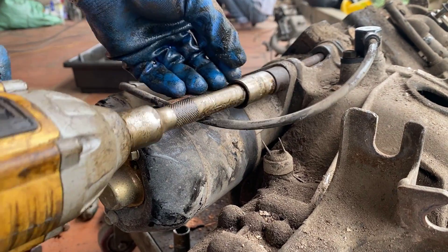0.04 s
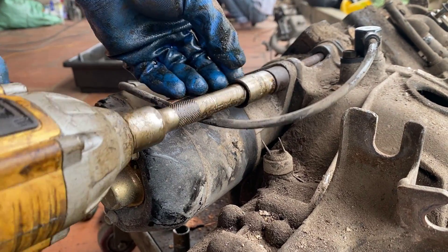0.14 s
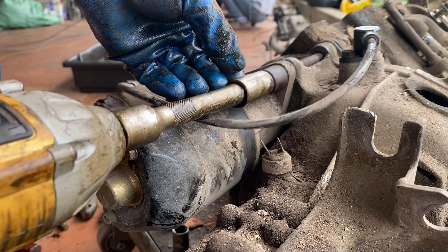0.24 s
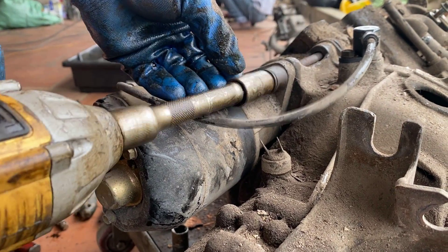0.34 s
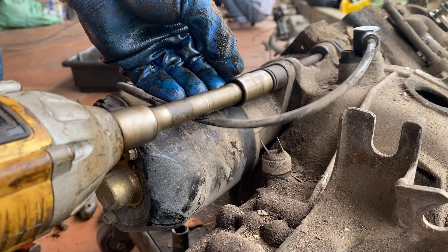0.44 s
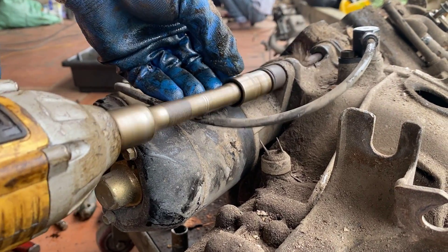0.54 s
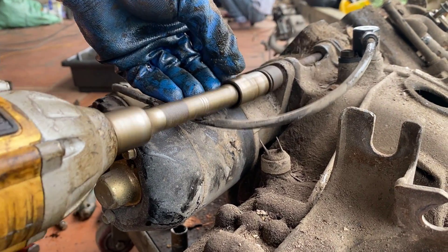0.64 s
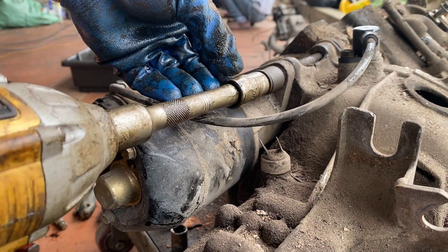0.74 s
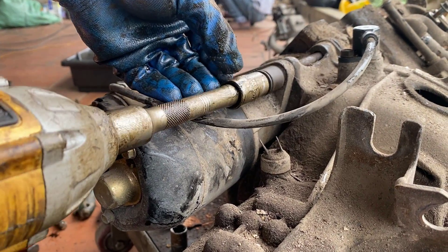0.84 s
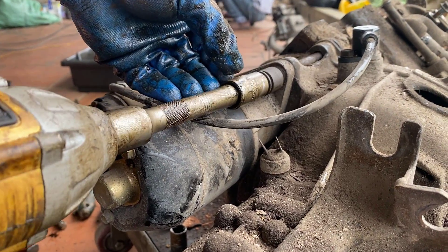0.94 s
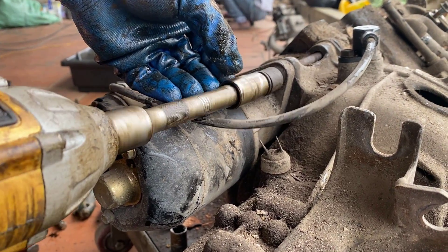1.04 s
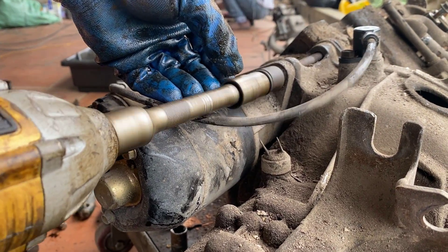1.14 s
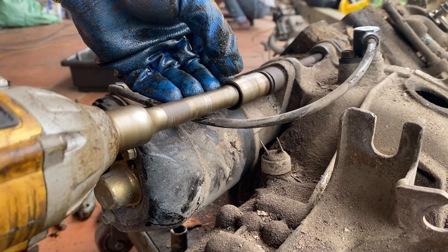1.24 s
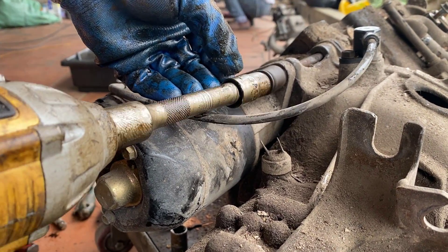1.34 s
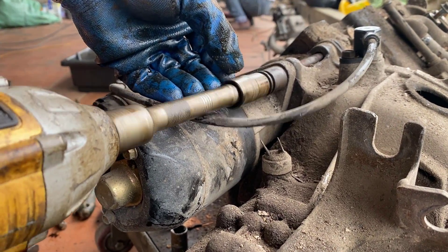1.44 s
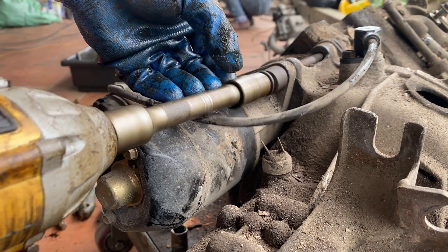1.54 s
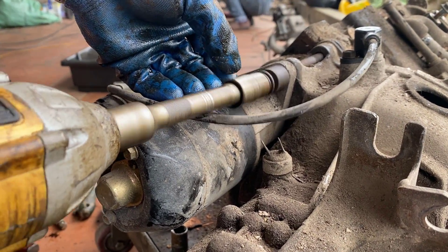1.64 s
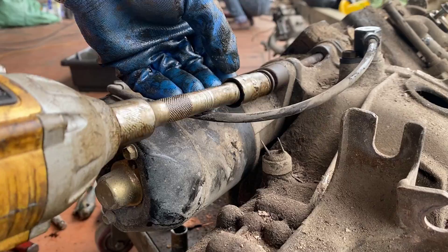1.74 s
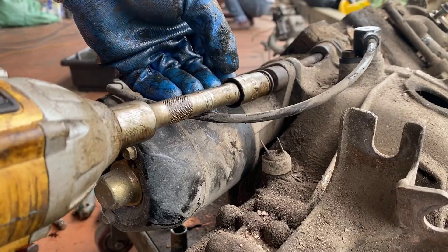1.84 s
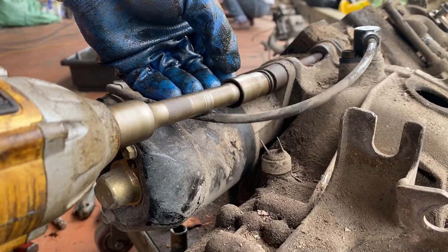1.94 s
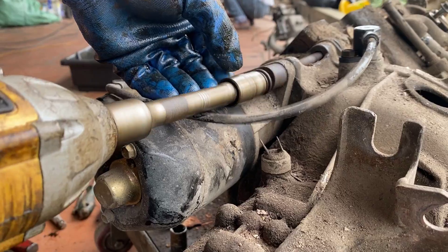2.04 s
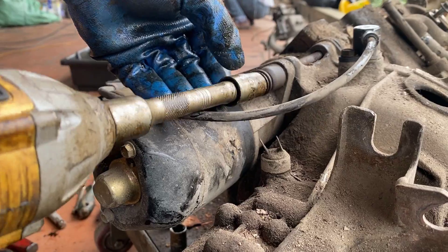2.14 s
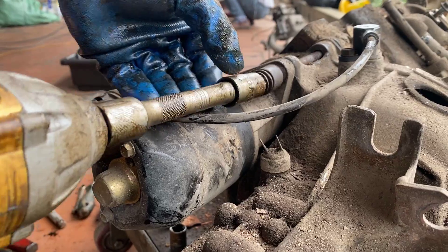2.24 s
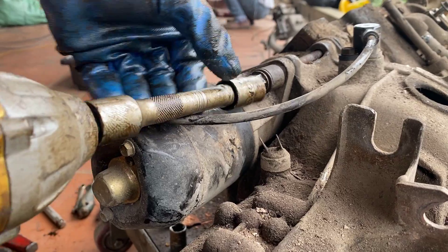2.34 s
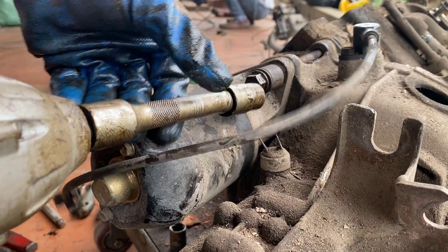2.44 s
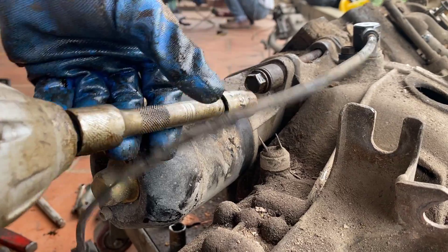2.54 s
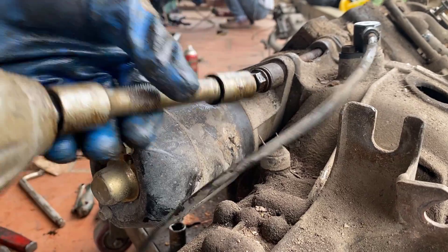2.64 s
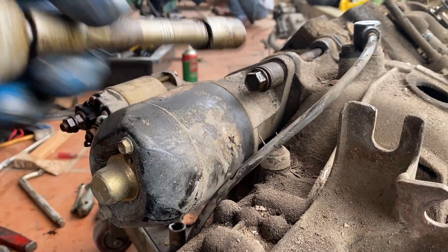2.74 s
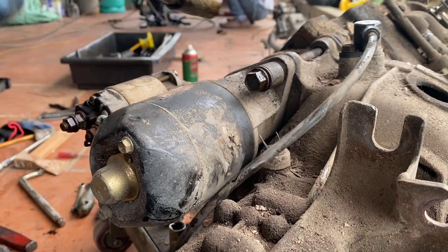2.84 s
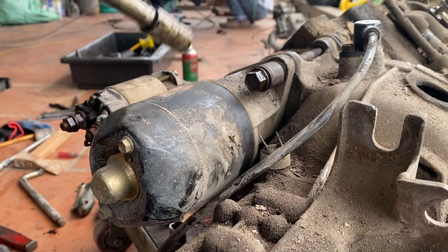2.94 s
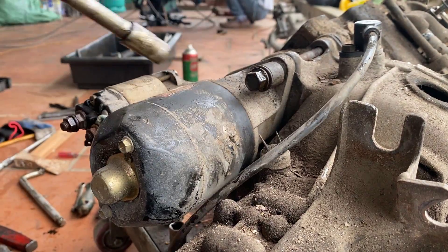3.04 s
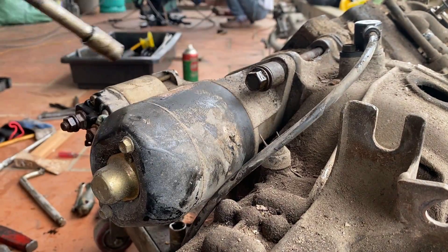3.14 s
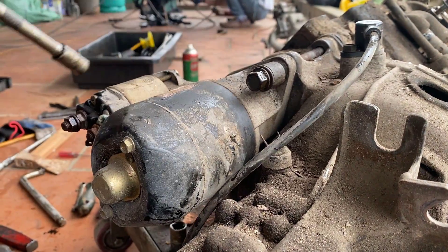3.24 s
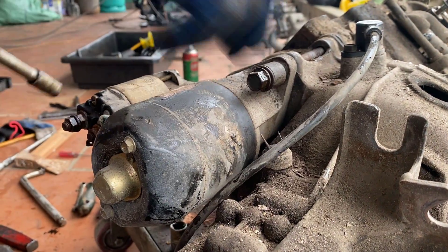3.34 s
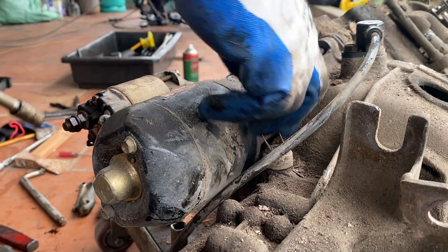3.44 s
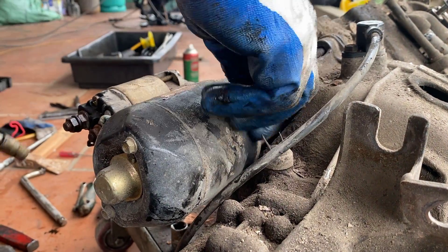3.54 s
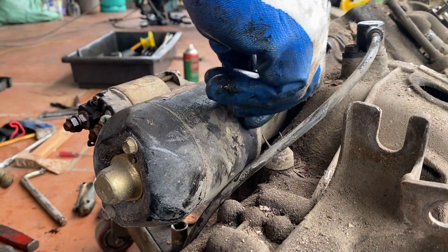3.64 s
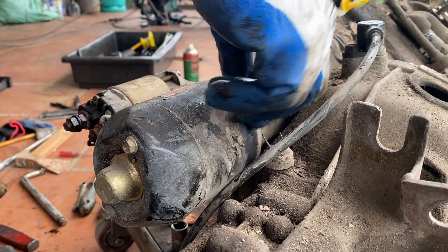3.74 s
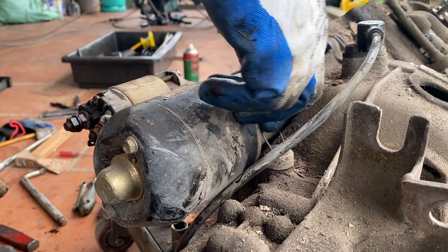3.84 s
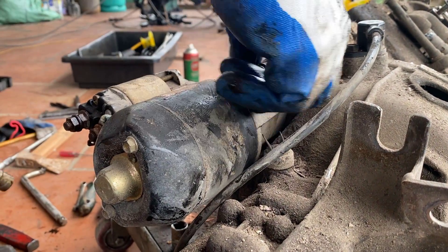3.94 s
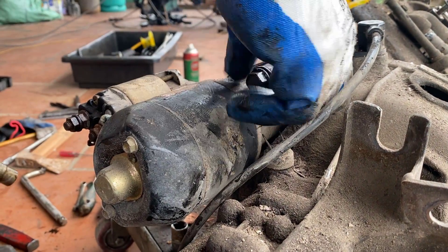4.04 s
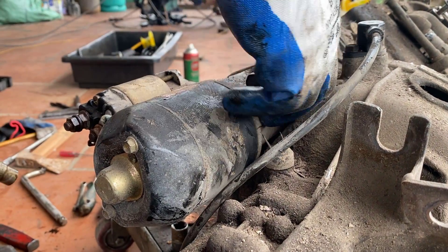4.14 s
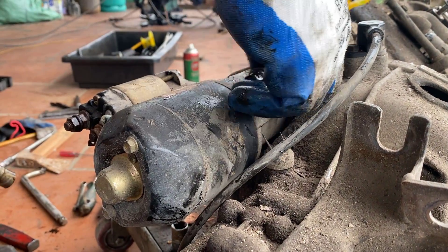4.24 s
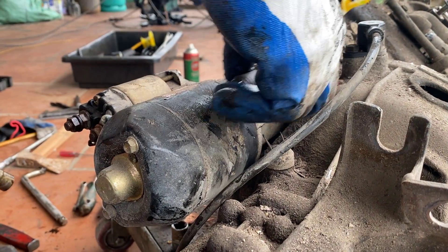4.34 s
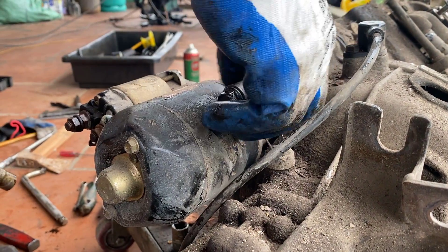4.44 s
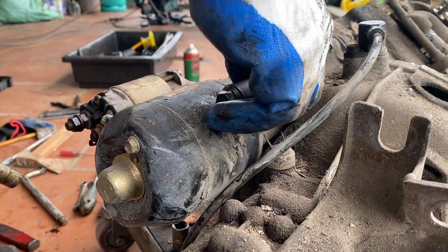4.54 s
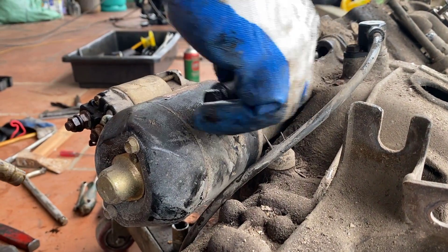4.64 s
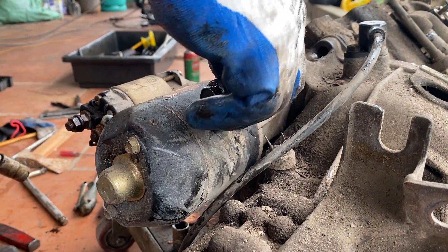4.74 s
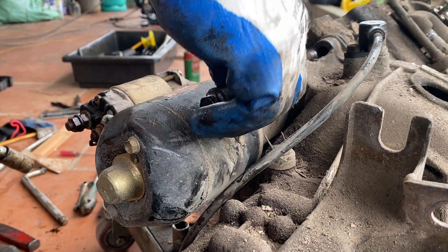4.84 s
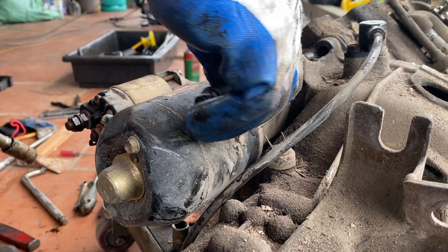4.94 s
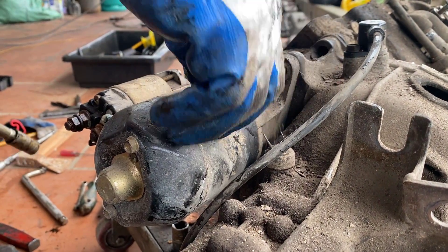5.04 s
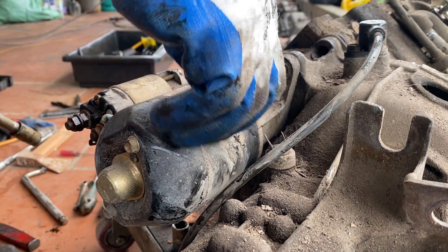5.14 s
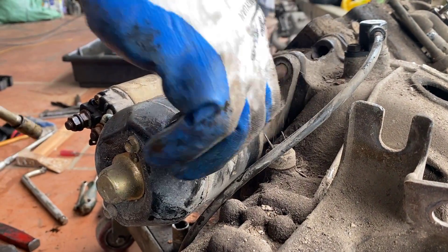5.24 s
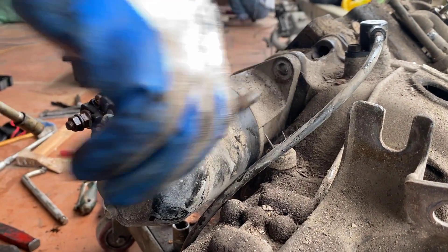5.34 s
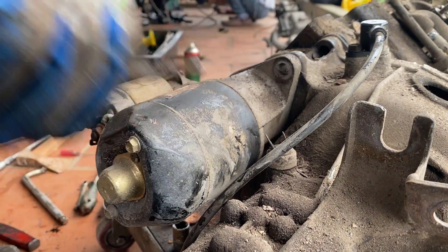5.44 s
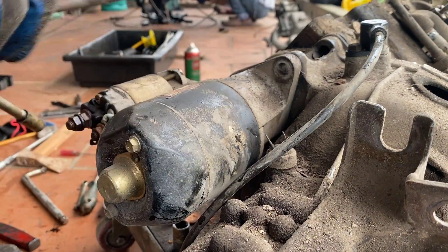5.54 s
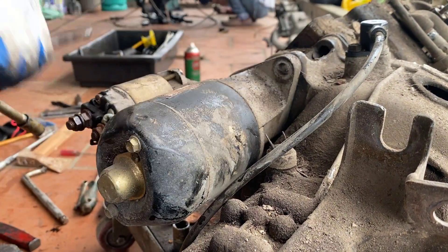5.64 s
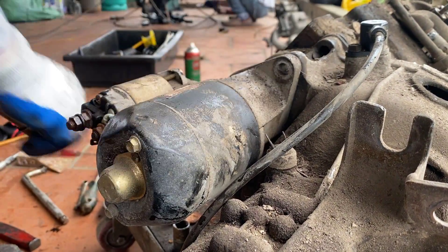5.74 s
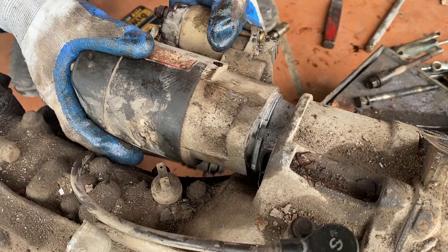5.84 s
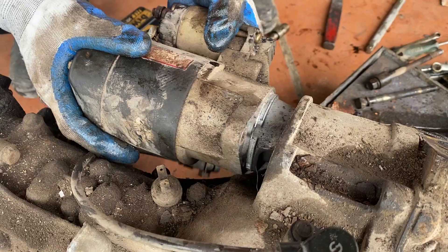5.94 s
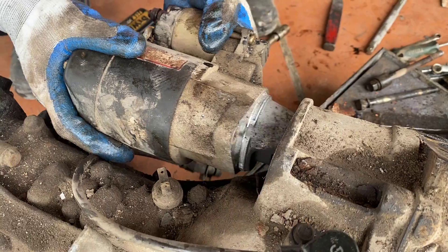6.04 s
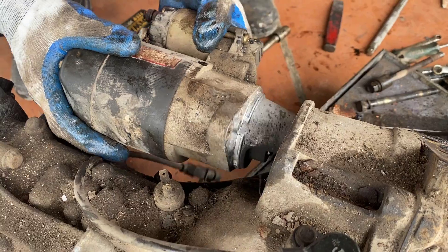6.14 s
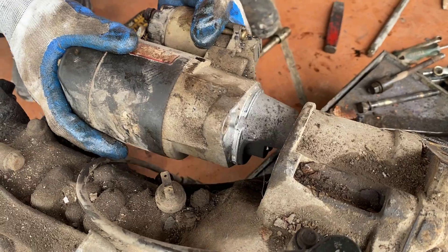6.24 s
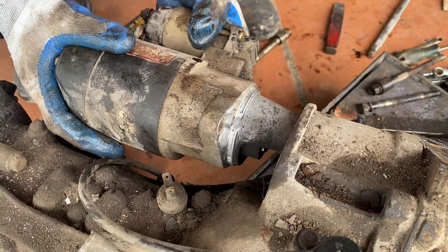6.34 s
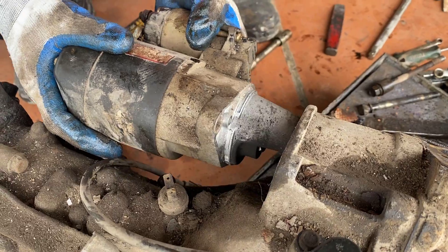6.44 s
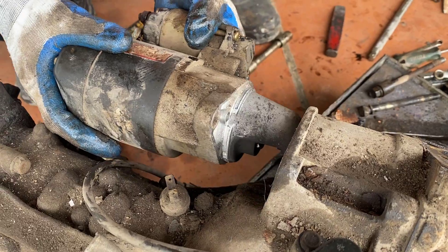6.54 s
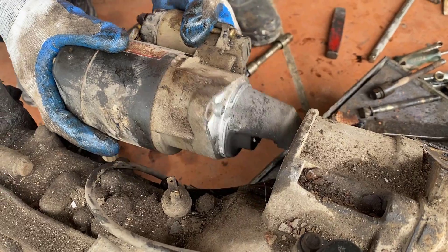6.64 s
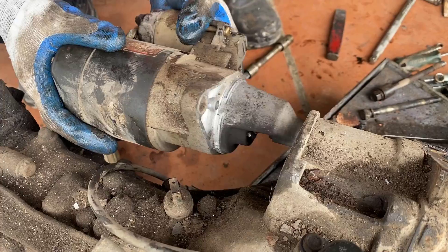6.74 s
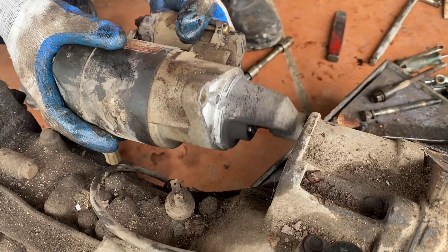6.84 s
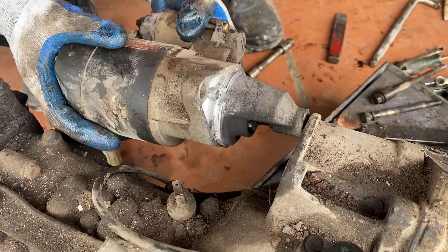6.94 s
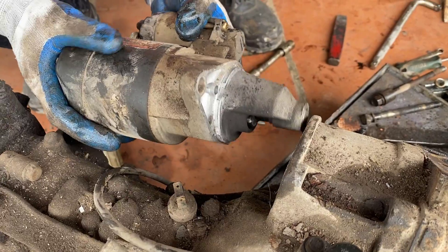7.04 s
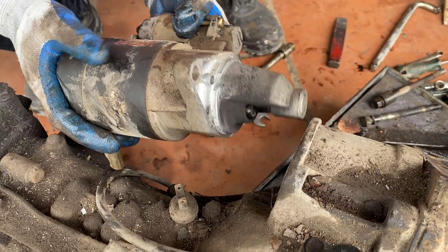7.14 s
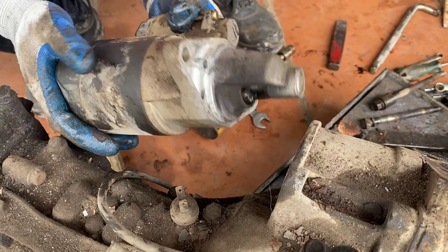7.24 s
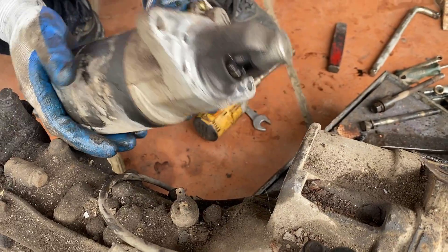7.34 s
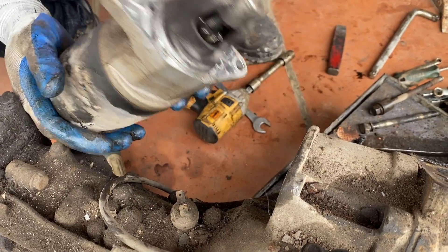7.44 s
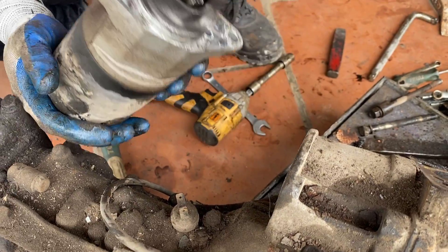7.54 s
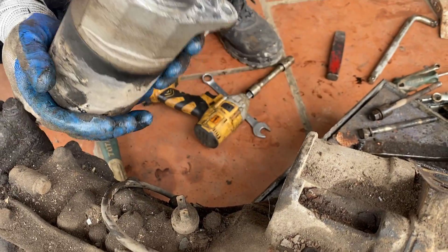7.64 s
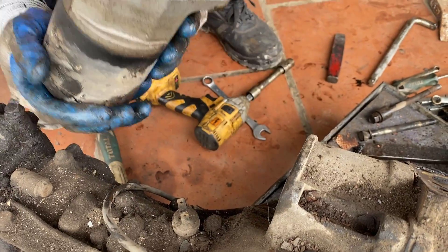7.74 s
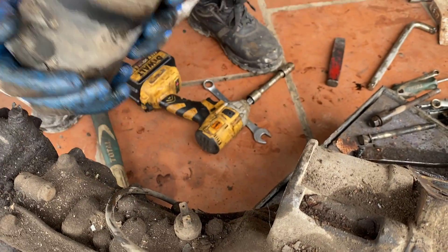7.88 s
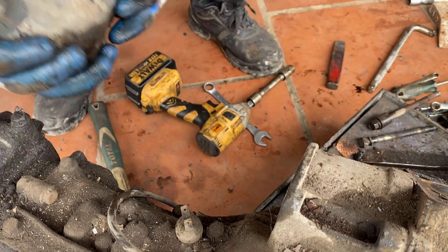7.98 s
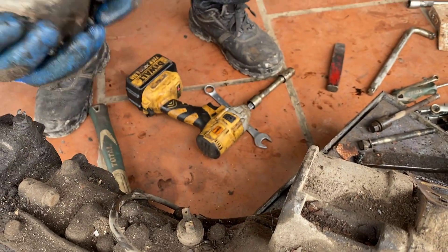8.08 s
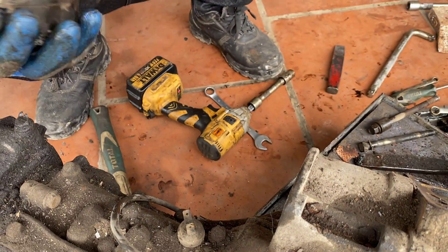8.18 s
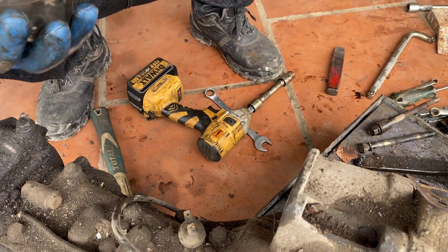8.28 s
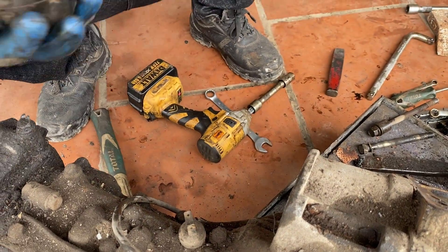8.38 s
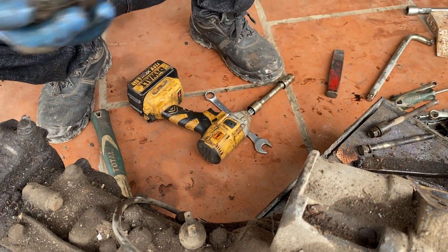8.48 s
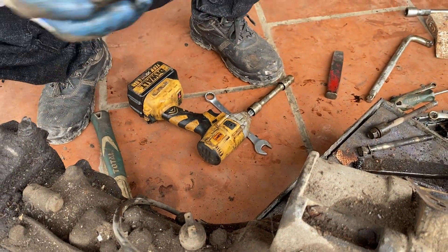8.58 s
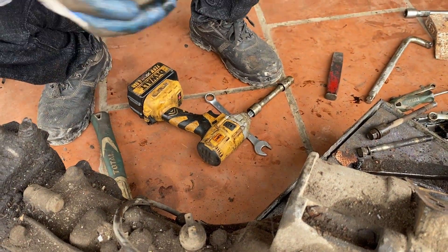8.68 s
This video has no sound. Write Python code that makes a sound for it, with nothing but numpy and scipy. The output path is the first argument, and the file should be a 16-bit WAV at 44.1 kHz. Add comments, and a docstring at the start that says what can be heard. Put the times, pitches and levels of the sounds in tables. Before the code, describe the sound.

Very close, an impact wrench cracks rapidly against a tight bolt, then spins it out in short rising whines, each ending in gear chatter. It slides off, and someone hammers metal steadily across a roofed yard while the bolt clinks loosely by hand. After a tiny dropout, a louder traffic-like wash appears; a heavy part knocks and scrapes out in gritty bursts. A bird whistles.

```python
"""A cordless impact wrench, already running, hammers a bolt loose on an old engine and spins it out in short runs.
Its motor is a stack of tones with gear noise; its blows are noise bursts with ringing steel, beside low thumps.
Then the bolt clinks as it is turned out by hand, while someone hammers metal across the roofed yard.
A bird chirps in gliding whistles over a background of coloured noise and a far motor's hum.
After a brief dropout the starter motor knocks and scrapes its way out, in bursts of gritty noise."""
import sys
import numpy as np
from scipy import signal
from scipy.fft import rfft, irfft, next_fast_len
from scipy.io import wavfile
from scipy.ndimage import uniform_filter1d

SR = 44100
rng = np.random.default_rng(int(sys.argv[2]) if len(sys.argv) > 2 else 0)


def wav_out(sig):
    """Save sig, one row per channel (or a flat mono array), as 16-bit PCM at SR to the path in sys.argv[1]."""
    wavfile.write(sys.argv[1], SR, np.round(np.clip(np.atleast_2d(sig).T, -1, 1) * 32767).astype(np.int16))


N = 384111
TIME = np.arange(N) / SR

# Pulls of the wrench's trigger; columns: pressed_s, released_s, relative level_db
TRIGGER_PULLS = [(-.165, 0.128, -3), (0.233, 0.766, 2.5), (1.098, 1.317, 2.5), (1.4862, 1.733, 2.5),
                 (1.929, 2.173, 2.6)]
# Colour of the gear noise, also used for other small steel parts; columns: pitch_hz, relative level_db
GEAR_COLOUR = [(300, -13.5), (490, -8), (620, -21.5), (850, -7.5), (1200, -2.5), (3200, -2.5), (9400, -9.5),
               (13100, -17), (16000, -25)]
# The moment when the sound drops out; columns: start_s, end_s
DROPOUT_SPAN = (5.905, 5.947)


def from_db(db):
    """Turn decibels into a plain gain."""
    return 10 ** (np.asarray(db) / 20)


def rms_one(x):
    """Scale a sound to an average strength (rms) of 1."""
    return x / np.sqrt(np.mean(x ** 2) + 1e-20)


def at_hz(points, hz):
    """Read a spectrum on a log-frequency axis, as pitch is heard."""
    known_hz, values = np.transpose(points)
    return np.interp(np.log(np.maximum(hz, 1)), np.log(known_hz), values)


def fader(rows):
    """Gain that follows a level curve (start_s, level_db) and is silent before it."""
    s, db = np.transpose(rows)
    return from_db(np.interp(TIME, s, db)) * (TIME > s[0])


def tinted(x, spectrum):
    """Give a sound a colour that falls away steeply under its lowest point; rms 1."""
    hz = np.fft.rfftfreq(len(x), 1 / SR)
    bass_fall = np.minimum(hz / spectrum[0][0], 1) ** 2
    gain = from_db(at_hz(spectrum, hz)) * bass_fall
    return rms_one(irfft(rfft(x) * gain, len(x)))


def noise(spectrum, size=N):
    """Coloured noise of rms about 1."""
    return tinted(rng.standard_normal(next_fast_len(size)), spectrum)[:size]


def metal(spectrum, peaks_db, width_hz):
    """Noise coloured by the many close resonances of a metal part; rms about 1."""
    size = next_fast_len(N)
    place = np.fft.rfftfreq(size, 1 / SR) / width_hz
    heights = np.clip(rng.standard_normal(SR), -2, 2)
    peaks = from_db(peaks_db * np.interp(place, np.arange(SR), heights))
    return tinted(irfft(rfft(rng.standard_normal(size)) * peaks, size), spectrum)[:N]


def grain(rough_db, per_s):
    """A gain that heads for a new random level per_s times a second; rms 1."""
    levels = np.clip(rng.standard_normal(N), -2, 2)
    return rms_one(from_db(rough_db * np.interp(TIME * per_s, np.arange(N), levels)))


def clicks(times, db):
    """One single-sample click for each event."""
    out = np.zeros(N)
    places = np.round(np.asarray(times) * SR).astype(int)
    out[np.clip(places, 0, N - 1)] = from_db(db)
    return out


def convolve(x, response):
    """Start a copy of the response at every moment of x."""
    return signal.oaconvolve(x, response)[:N]


def split(x, hz):
    """The parts of a sound under and over a frequency."""
    filters = [signal.butter(2, hz, kind, fs=SR, output="sos") for kind in ("low", "high")]
    return [signal.sosfilt(sos, x) for sos in filters]


def bursts(times, db, t60, hold=0.00021):
    """Envelope of events that hold briefly, then fall 60 dB in t60 seconds; their powers add."""
    age = TIME[:SR]
    shape = from_db(-60 * np.maximum(age - hold, 0) / t60)
    power = convolve(clicks(times, db) ** 2, shape ** 2)
    return np.sqrt(np.abs(power))


def bounces(times, db, gap_s, t60, uneven_db=6.5, count=5):
    """Envelope of steel meeting steel: each event is a quick, uneven run of contacts that share its energy."""
    chance = rng.standard_normal((len(times), 2, count))
    gaps = gap_s * (1 + np.tanh(chance[:, 0]) / 2)
    s = np.asarray(times)[:, None] + np.cumsum(gaps, axis=1) - gaps[:, :1]
    # the second contact tends to be the strongest
    sizes = from_db(uneven_db * (chance[:, 1] - np.abs(np.arange(count) - 1) / 2))
    shares_db = 10 * np.log10(sizes ** 2 / np.mean(sizes ** 2, axis=1, keepdims=True))
    return bursts(s.ravel(), (np.reshape(db, (-1, 1)) + shares_db).ravel(), t60)


def ring(times, db, modes, t60, spread_db=2):
    """Fading sine tones: every touch strikes each mode with a strength of its own."""
    age = TIME[:SR]
    out = 0
    for hz, level_db in modes:
        strikes = clicks(times, db + level_db + spread_db * rng.standard_normal(len(times)))
        out = out + convolve(strikes, np.sin(2 * np.pi * hz * age) * from_db(-60 * age / t60))
    return out


def clang(contact, modes, t60):
    """A rough contact sets modes (pitch_hz, level_db) ringing, in a new mixture every time."""
    age = TIME[:SR // 2]
    tones = sum(from_db(db) * np.sin(2 * np.pi * (hz * age + rng.random())) for hz, db in modes)
    response = tones * from_db(-60 * age / t60)
    return convolve(contact * rng.standard_normal(N), response / np.linalg.norm(response))


def echo():
    """Diffuse echo of the roofed yard: noise in octaves, each dying at its own rate; energy 1."""
    # Reverberation under the roof; columns: pitch_hz, time to fall 60 dB [s]
    roof_fade = [(150, 0.07), (600, 0.72), (2500, 0.46), (6000, 0.5), (15000, 0.14)]
    age, out = TIME[:SR], 0
    edges = np.geomspace(150, 19000, 8)
    for low, high in zip(edges, edges[1:]):
        octave = signal.butter(2, [low, high], "band", fs=SR, output="sos")
        band = signal.sosfilt(octave, rng.standard_normal(SR))
        out = out + band * from_db(-60 * age / at_hz(roof_fade, np.sqrt(low * high)))
    return rms_one(out) / np.sqrt(SR)


def motor(whine_db=-32, gears_db=-37, brake_db=-30, flutter=0.008, brake_whine_db=5):
    """Each pull runs the motor up; the tight bolt holds it back; on release the brake makes the gears chatter."""
    # Creep, steady climb and levelling off after a pull; columns: time_after_pull_s, motor_tone_hz
    run_up = [(.012, 0), (.04, 24.5), (.103, 430), (.193, 1001.5), (.218, 1072), (0.251, 1113.5)]
    # The bolt holds the motor back until it comes free; columns: time_s, highest_motor_tone_hz
    bolt_load = [(.64, 790.5), (.685, 965.3), (.755, 1070), (1.1, 1156)]
    # Tones of the whine; columns: multiple of the motor tone, relative level_db
    whine_tones = [(1, -3.5), (1.5, -16.5), (2, -5), (3, -10.5), (4, -8.5), (5, -3.5), (6, -15.5),
                   (9, -9.5)]
    # How the housing colours the whine; columns: pitch_hz, gain_db
    housing = [(250, -48), (480, -9), (620, -14.5), (850, -3.5), (1250, -18), (1750, -2.5), (2200, 3),
               (2900, -2), (4200, -7), (5400, -2), (8000, -22)]
    # Colour of the gear chatter under braking; columns: pitch_hz, relative level_db
    brake_colour = [(250, -21), (500, -10), (3300, -5), (5700, -10), (6700, -9), (7700, -11.5),
                    (16000, -26)]
    # Extra gear noise while the bolt is tight; columns: time_s, gain_db
    strain_curve = [(.38, 13), (.44, -2)]
    brake_s = .067  # time to stop after release

    limit_hz = np.interp(TIME, *np.transpose(bolt_load))
    hz, gain, braking = np.zeros(N), np.zeros(N), np.zeros(N)
    for pressed, release, db in TRIGGER_PULLS:
        span = (TIME > pressed) & (TIME < release + brake_s)
        t = TIME[span]
        free_hz = np.interp(np.minimum(t, release) - pressed, *np.transpose(run_up))
        driven = np.minimum(free_hz, limit_hz[span])
        hz[span] = np.maximum(driven, 0) * np.clip(1 - (t - release) / brake_s, 0, 1) ** .62
        gain[span], braking[span] = from_db(db), t > release
    speed = hz / run_up[-1][1]

    # the speed flutters, most of all while the bolt is tight
    tightness = np.interp(limit_hz, [bolt_load[0][1], bolt_load[-1][1]], [4.5, 1])
    unsteady = flutter * tightness * noise([(10, 4), (170, 0), (3000, -79.5)])
    phase = 2 * np.pi * np.cumsum(hz * (1 + unsteady)) / SR

    # the brake current swells the lowest tones and drowns the high ones
    whine = 0
    for k, db in whine_tones:
        tone_db = db + at_hz(housing, k * hz) + brake_whine_db * braking * (1 - np.log2(k))
        whine = whine + from_db(tone_db) * np.sin(k * phase) * grain(rough_db=2.4, per_s=200)

    # tooth noise pulses with the shaft, and brightens with speed
    teeth = metal(GEAR_COLOUR, peaks_db=2.5, width_hz=130) * grain(rough_db=3.5, per_s=1800)
    low, high = split(teeth * (1 + 0.34 * np.sin(phase / 2)), hz=3060)
    strain = from_db(np.interp(TIME, *np.transpose(strain_curve)))
    gears = (low * speed ** .5 - high * speed ** 0.77) * strain * (1 - braking)
    chatter = noise(brake_colour) * grain(rough_db=3.5, per_s=1500) * braking * speed ** 0.77
    whine_part = from_db(whine_db) * whine * speed ** (1 / 4)
    return gain * (whine_part + from_db(gears_db) * gears + from_db(brake_db) * chatter)


def thumps(thump_clicks, start_hz=780, end_hz=68, glide_s=0.0041, peak_s=0.013, steep=4.4, lead=0.54):
    """A low thump whose highs arrive first, so that it sweeps down within two or three cycles."""
    age = TIME[:SR // 6]
    glide = np.exp(-age / glide_s)
    phase = 2 * np.pi * (end_hz * age + (start_hz - end_hz) * glide_s * (1 - glide))
    swell = np.exp(-steep / 2 * np.log((age + 1 / SR) / peak_s) ** 2) + lead * glide
    return convolve(thump_clicks, np.sin(phase) * swell)


def impacts(socket_db=-7, socket_t60=0.032):
    """The hammer cracks on the anvil and the socket rings; socket and gears click as their play is taken up."""
    # The hammer beats on the anvil while the bolt is tight; columns: start_s, low_thump_db
    anvil_blows = [(.009, -49), (0.037, -12.5), (0.06, -11), (0.083, -6), (0.1048, -6), (0.1264, -19.5),
                   (0.3275, -48.5), (0.3549, -49), (0.377, -46), (0.3992, -9), (0.422, -21.5),
                   (0.4448, -17), (0.468, -31), (.491, -18.5), (0.5158, -6.5), (0.5406, -8.5), (0.566, -7),
                   (0.592, -5.5), (0.6175, -28)]
    # The loose socket rattles on the bolt; columns: start_s, level_db
    socket_rattles = [(0.139, -23), (0.161, -28), (0.24, -30.5), (0.278, -19.5), (0.2842, -12),
                      (0.301, -16.5), (1.378, -49), (1.843, -50.5), (1.893, -50.5), (1.972, -33),
                      (2.242, -26)]
    # Colour of the anvil's steel; columns: pitch_hz, relative level_db
    anvil_colour = [(500, -16.5), (1060, -6), (1600, -2.5), (3300, 0), (7000, -3), (10700, -2.5),
                    (16000, -17)]
    # Pitches that each blow rings in the socket; one column: pitch_hz
    socket_pitches = [1590, 2394, 2720, 3030, 2960, 3450, 3780, 4800, 5570, 5940, 6100]
    # Ringing tones of the motor's twitch; columns: pitch_hz, relative level_db
    twitch_tones = [(2200, 10), (4420, -2), (5400, -2)]
    # Separate low thumps; columns: start_s, level_db
    low_thumps = [(0.192, -26.5), (0.827, -43), (7.464, -38.5), (8.288, -40), (8.469, -38.5)]
    blow_db, twitch_db = -12.3, -41.5

    s, low_db = np.transpose(anvil_blows)
    blow_contact = bounces(s, blow_db, gap_s=0.0012, t60=0.0094)
    rattle_contact = bounces(*np.transpose(socket_rattles), gap_s=0.00046, t60=.012)
    contact = np.hypot(blow_contact, rattle_contact)
    steel = metal(anvil_colour, peaks_db=-0.5, width_hz=170) * contact
    socket = from_db(socket_db) * clang(contact, [(hz, 0) for hz in socket_pitches], socket_t60)

    # each pull first twitches the motor, which takes up the play in the gears; then it starts
    pulls = [pressed for pressed, _, _ in TRIGGER_PULLS if pressed > 0]
    twitches = ring(pulls, twitch_db, twitch_tones, t60=0.031)
    twitches = twitches + noise(GEAR_COLOUR) * bursts(pulls, twitch_db, t60=.008, hold=0.0025)

    # successive low thumps alternate in sign
    thump_clicks = clicks(s[::2], low_db[::2]) - clicks(s[1::2], low_db[1::2])
    bright = split(steel + socket + twitches, hz=380)[1]
    return bright + thumps(thump_clicks + clicks(*np.transpose(low_thumps)))


def yard(early_db=0, late_db=3):
    """Open air as coloured noise and the wavering hum of a far motor; after the dropout, a louder wash of traffic."""
    # Background level before and after the dropout; columns: time_s, level_db before early_db or late_db
    early_level, late_level = [(1, -71.5), (3.6, -64.5), (5.8, -59)], [(5.97, -57), (7.0, -53.5), (8.71, -52)]
    # Background colour before and after the dropout; columns: pitch_hz, relative level_db
    early_colour, late_colour = [(50, -17), (75, 3.5), (160, 1), (450, -10), (1390, -23.5), (3580, -36.5),
                                 (14000, -38)], [(45, -2), (90, 6.5), (330, -0.5), (866, -10.5),
                                                    (6200, -20), (7200, -33), (15000, -36)]
    # The far motor, which speeds up a little; columns: time_s, pitch_hz, level_db relative to the air
    far_motor = [(3.199, 140.3, -6.5), (3.7, 136.4, 1), (5.1, 160.1, -3), (5.899, 163.4, 1)]
    s, hz, db = np.transpose(far_motor)
    waver = .5 * noise([(1, 2.0), (8, -9.0), (40, -77.5)])
    hum = np.sin(2 * np.pi * np.cumsum(np.interp(TIME, s, hz)) / SR + waver)
    air_and_hum = noise(early_colour) + from_db(np.interp(TIME, s, db)) * hum
    early = air_and_hum * from_db(early_db + np.interp(TIME, *np.transpose(early_level)))
    late = noise(late_colour) * from_db(late_db + np.interp(TIME, *np.transpose(late_level)))
    return np.where(TIME < DROPOUT_SPAN[0], early, late)


def bird(warble=0.03, warble_hz=75):
    """A thin, uneven whistle: a warbling sine that plunges and ends on a soft low note."""
    # When the bird calls; columns: start_s, level_db
    calls = [(0.971, -64.5), (2.583, -61), (2.895, -58.5), (5.773, -57.5), (5.85, -63), (6.222, -45.5),
             (6.577, -47), (7.968, -48), (8.311, -43.5)]
    # The course of one call; columns: time_after_start_s, pitch_hz, relative level_db
    call_shape = [(0, 6700, -9), (.025, 4100, -2), (.036, 2800, -3), (.055, 2300, -16), (.078, 2200, -7),
                  (.1, 2150, -26)]
    s, hz, db = np.transpose(call_shape)
    age = TIME[TIME < s[-1]]
    pitch_hz = np.interp(age, s, hz) * (1 + warble * np.sin(2 * np.pi * warble_hz * age))
    call = np.sin(2 * np.pi * np.cumsum(pitch_hz) / SR) * from_db(np.interp(age, s, db))
    return convolve(clicks(*np.transpose(calls)), call) * grain(rough_db=5.5, per_s=180)


def slide(ring_db=-9):
    """The socket slides off the bolt: rough rubbing noise and a faint ring that it excites."""
    # Strength of the rubbing; columns: time_s, level_db
    rub_level = [(2.26, -75), (2.51, -60.5), (2.6, -71), (2.7, -110)]
    # Ringing of the rubbed socket; columns: pitch_hz, relative level_db
    rub_tones = [(3010, -3.5)]
    rub = fader(rub_level) * grain(rough_db=2.5, per_s=990)
    return rub * noise(GEAR_COLOUR) + from_db(ring_db) * clang(rub, rub_tones, t60=.04)


def hammering(crack_db=4, tail_db=-4.5, fresh_db=-6, body_db=1.0, ring_db=-3, top_hz=9500):
    """Far blows, nearly alike: a short crack with a ping, the yard's grainy echo, and the briefly ringing workpiece."""
    # About five blows a second; columns: start_s, strength_db, extra top treble [dB]
    far_blows = [(2.778, -54, 13), (2.991, -48.5, 6), (3.191, -55.5, 10), (3.378, -42.5, -1),
                 (3.581, -41, -5), (3.767, -41.5, -3), (3.972, -40.5, -1), (4.17, -39.5, 0),
                 (4.379, -47.5, 9.5), (4.585, -56.5, -1.5), (4.781, -39.5, -24), (4.983, -38, -16),
                 (5.191, -40, -15), (5.398, -48, 12), (5.562, -50, 14.5)]
    # Ringing tones of the workpiece; columns: pitch_hz, relative level_db
    workpiece_tones = [(553, 2.5), (1040, 4), (1460, 1), (4290, -1.5), (5400, -0.5)]
    # Colour of the blows; columns: pitch_hz, relative level_db
    blow_colour = [(420, -13), (560, 2), (760, 6), (900, -18), (1200, 2), (5500, 2), (8000, 1),
                   (10500, -4.5), (15000, -16)]
    s, high_db, top_db = np.transpose(far_blows)
    # the dull body is alike for hard and soft blows, and grows 1.8 dB louder per second
    low_db = -47 + 1.8 * (s - s.mean())
    ping_db = 8  # the workpiece's highest mode, over the body

    steel = metal(blow_colour, peaks_db=6, width_hz=78)
    tail = tinted(np.pad(echo(), (SR // 2, N)), blow_colour)[SR // 2:][:N]
    tail = from_db(tail_db) * tail / np.std(tail[:SR // 20]) * grain(rough_db=0.5, per_s=320)
    blow = (tail + steel * bursts([0.001], crack_db, t60=0.036))[:SR]

    def blows(db):
        """The blows over the whole band: one repeated blow plus noise that differs each time."""
        return convolve(clicks(s, db), blow) + steel * bursts(s, db + fresh_db, t60=0.32)

    low = split(blows(low_db + body_db), hz=2300)[0]
    high = split(blows(high_db), hz=3020)[1]
    middle = split(high, top_hz)[0]
    top = split(blows(high_db + top_db), top_hz)[1]
    workpiece = clang(bursts(s, low_db + ring_db, t60=0.3), workpiece_tones, t60=.06)
    ping = ring(s, low_db + ping_db, workpiece_tones[-1:], t60=0.031)
    return low - middle + top + workpiece + ping


def bolt(knock_db=0, ring_db=-6, grit_db=-4):
    """The loose bolt grazes its hole: the casting knocks dully, the bolt rings high, the thread ticks."""
    # The bolt touches the wall of its hole; columns: start_s, knock_db, ring level before ring_db [dB]
    wall_touches = [(4.109, -61, -51), (4.141, -59, -62), (4.405, -46, -38), (4.493, -47.5, -67),
                    (4.711, -47.5, -49), (4.735, -50.5, -41), (5.023, -41.5, -54), (5.051, -41.5, -45),
                    (5.072, -40, -35), (5.119, -44.5, -57), (5.269, -44, -41), (5.281, -41.5, -35),
                    (5.346, -51, -42), (5.365, -52, -45), (5.419, -44.5, -21), (5.451, -46, -53)]
    # The bolt's high ring; columns: pitch_hz, relative level_db
    bolt_tones = [(6430, 3.5), (6800, -12), (8730, -2)]
    # The casting's dull knock; columns: pitch_hz, relative level_db
    hole_tones = [(990, 2), (1300, -2.5), (1900, -1.5)]
    s, low_db, high_db = np.transpose(wall_touches)
    knocks = bounces(s, low_db + knock_db, gap_s=0.0012, t60=0.015)
    ring_contact = bounces(s, high_db + ring_db, gap_s=0.00056, t60=0.0099)
    rings = clang(ring_contact, bolt_tones, t60=0.037)
    ticks = from_db(grit_db) * knocks * noise(GEAR_COLOUR)
    return clang(knocks, hole_tones, t60=0.014) + rings + ticks


def repeats(rows, gap_s):
    """Spread each row (start_s, length_s, level_db) into evenly spaced touches: their times and levels."""
    touches = []
    for s, length, db in rows:
        for k in range(1 + max(round(length / gap_s), 0)):
            touches.append((s + k * gap_s, db))
    return np.transpose(touches)


def starter(knock_db=0, scrape_db=-4, tail_db=-9, rustle_db=-1):
    """The starter drags in its seat, bumps the housing and scrapes out over grit; gloves and clothes rub."""
    # Bumps on the engine's housing; columns: start_s, level_db
    housing_bumps = [(6.7879, -31.5), (6.789, -22.5), (7.342, -43)]
    # Tugs that scrape the starter out over grit; columns: start_s, length_s, level before scrape_db [dB]
    scrape_tugs = [(6.8727, 0, -24), (6.9747, .025, -30), (7.0608, .025, -27.5), (7.1232, .025, -27),
                   (7.222, .05, -24.5), (7.3736, .025, -25), (7.4707, .075, -24.5)]
    # Colours of bumps, grit, clothes and seat; columns: pitch_hz, relative level_db
    bump_colour, grit_colour = [(150, -11), (277, 5), (700, 4), (1400, 3), (2300, -5), (4300, -11.5),
                                (6020, -5), (16000, -30)], [(400, 5), (520, -18), (760, 11), (980, -3), (1500, 7),
                                                      (2000, 4), (2900, 4), (3500, 7), (9600, 12.5),
                                                      (14100, 6.5), (16000, -4)]
    cloth_colour, seat_colour = [(600, -10), (2260, -6), (12500, -7.5), (16000, -24)], [(250, -23), (380, 6), (700, -8.5), (2400, -26.5),
                                                (3500, -13.5), (5000, -25), (14000, -31.5)]
    # Rubbing of gloves and clothes; columns: time_s, level before rustle_db [dB]
    rustle_level = [(7.62, -37.5), (7.8, -60), (7.93, -52.5), (8.06, -43.5), (8.17, -57), (8.32, -48.5),
                    (8.71, -45)]
    # Dragging in the seat; columns: time_s, level_db
    drag_level = [(5.98, -53), (6.22, -50), (6.3, -66.5)]

    s, db = np.transpose(housing_bumps)
    low, high = split(noise(bump_colour), hz=1780)
    low_knocks = low * bursts(s, db + knock_db, t60=0.078)
    high_knocks = high * bursts(s, db + knock_db, t60=0.021, hold=0.003)

    # a tug sticks and slips at an even spacing
    s, db = repeats(scrape_tugs, gap_s=.025)
    slips = bursts(s, db + scrape_db, t60=0.013, hold=0.001) * grain(rough_db=5, per_s=1500)
    tails = bursts(s, db + tail_db, t60=0.45) * grain(rough_db=1.5, per_s=700)
    scrapes = metal(grit_colour, peaks_db=3, width_hz=42) * np.hypot(slips, tails)

    rustle = from_db(rustle_db) * noise(cloth_colour) * fader(rustle_level) * grain(rough_db=1.5, per_s=170)
    drag = noise(seat_colour) * fader(drag_level) * grain(rough_db=1.5, per_s=110)
    return low_knocks - high_knocks + scrapes + rustle + drag


def scene(near_echo_db=-25, blow_echo_db=-26, bird_echo_db=-5):
    """Near things are almost dry; the bird is heard through the yard. The motor carries no deep bass."""
    wrench = split(motor(), hz=280)[1] + slide()
    near, blows, chirps = wrench + bolt() + starter(), impacts(), bird()
    sent = from_db(near_echo_db) * near + from_db(blow_echo_db) * blows + from_db(bird_echo_db) * chirps
    wet = convolve(sent, echo())
    return (near + blows + chirps + wet + hammering() + yard())[None]


def record(dry):
    """The deepest bass is cut, the sound drops out briefly, the loudest peaks are rounded, the top is cut."""
    outside = (TIME < DROPOUT_SPAN[0]) | (TIME > DROPOUT_SPAN[1])
    heard = uniform_filter1d(1. * outside, size=128)  # soft edges
    x = split(dry, hz=32)[1] * np.maximum(heard, from_db(-38))
    rounded = x / (1 + (x / .82) ** 4) ** (1 / 4)
    top_cut = signal.ellip(10, .2, 90, 15900, fs=SR, output="sos")
    return signal.sosfilt(top_cut, rounded)


dry = scene()
out = record(dry)
wav_out(out)
```